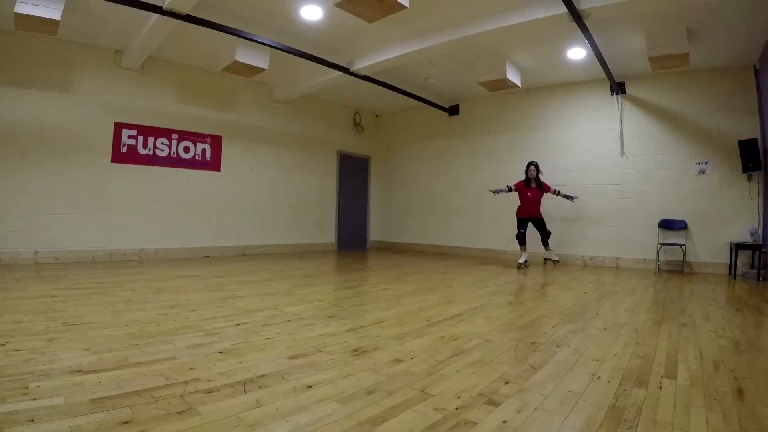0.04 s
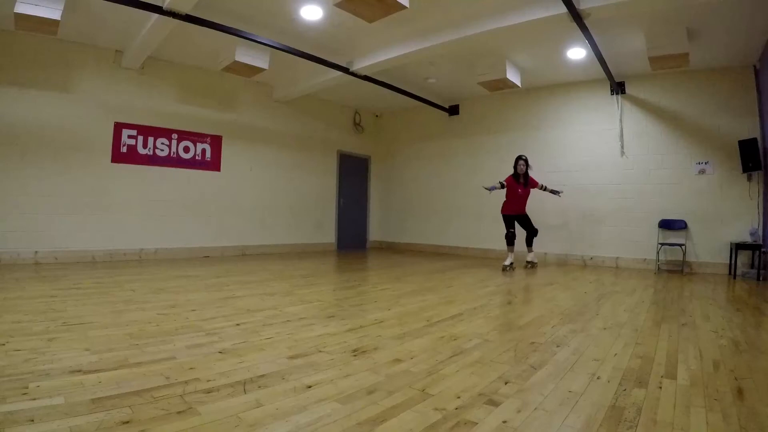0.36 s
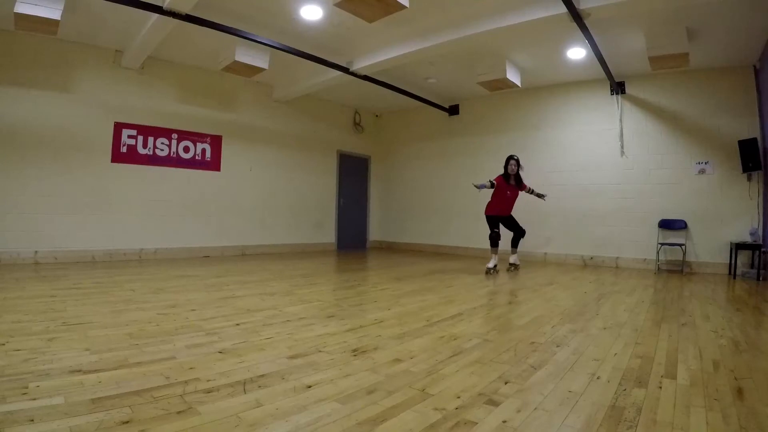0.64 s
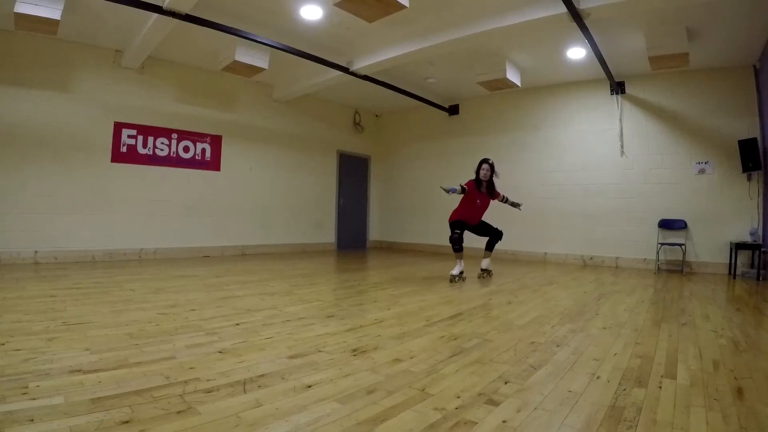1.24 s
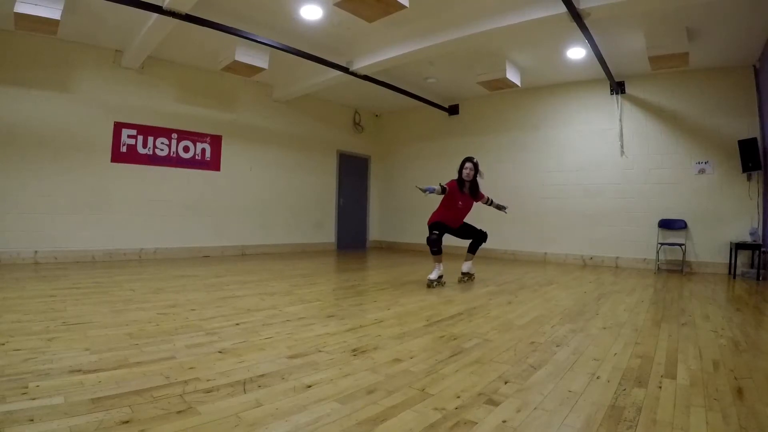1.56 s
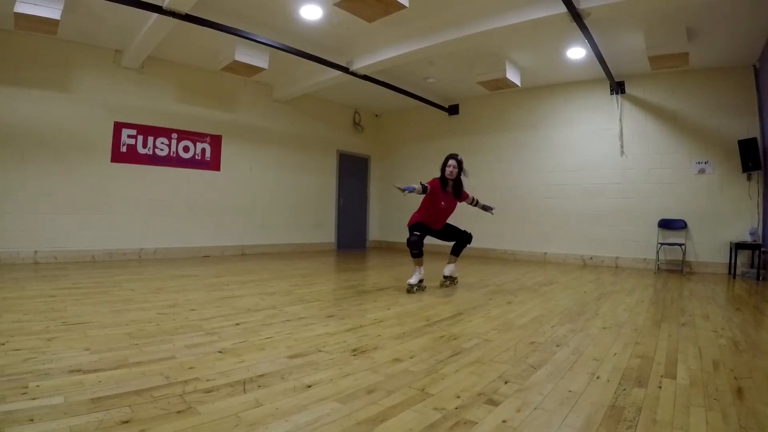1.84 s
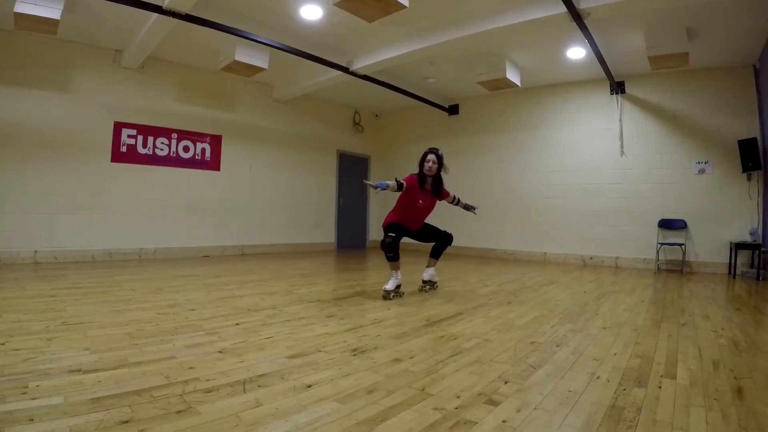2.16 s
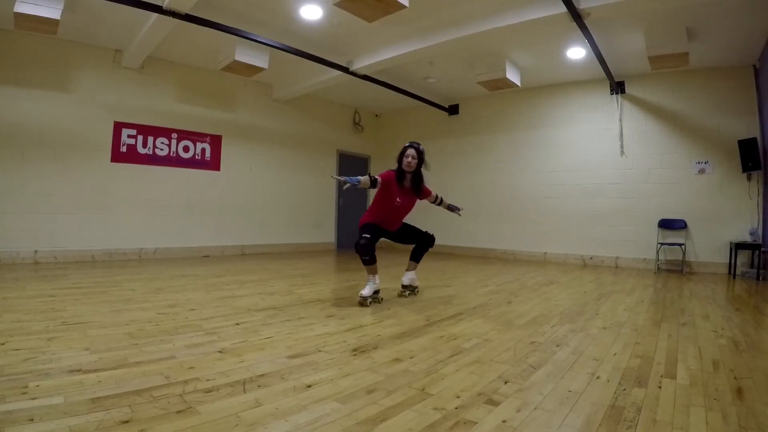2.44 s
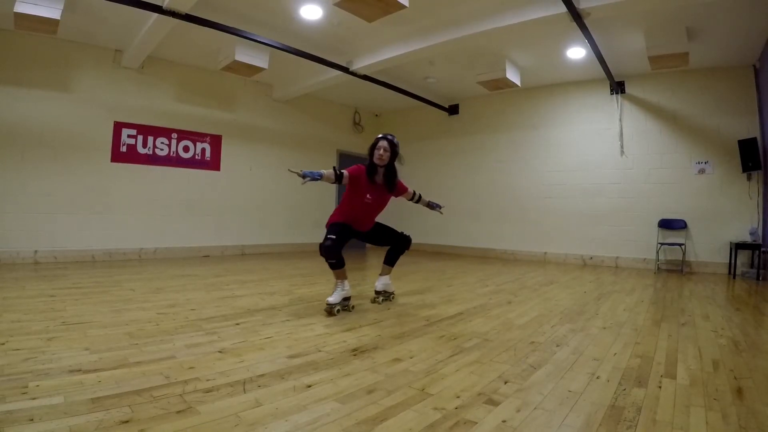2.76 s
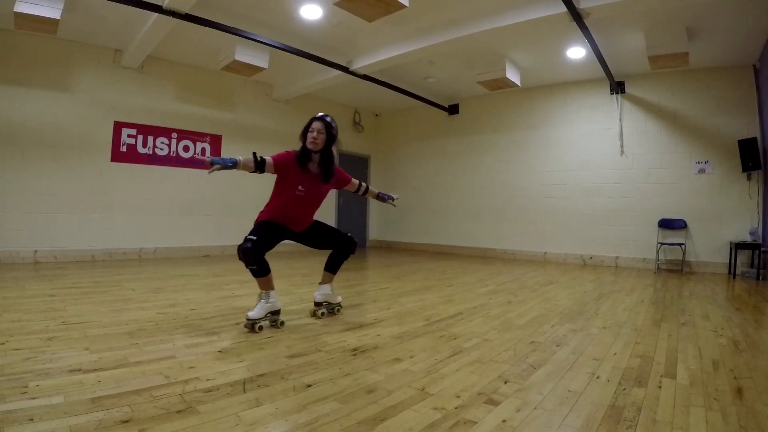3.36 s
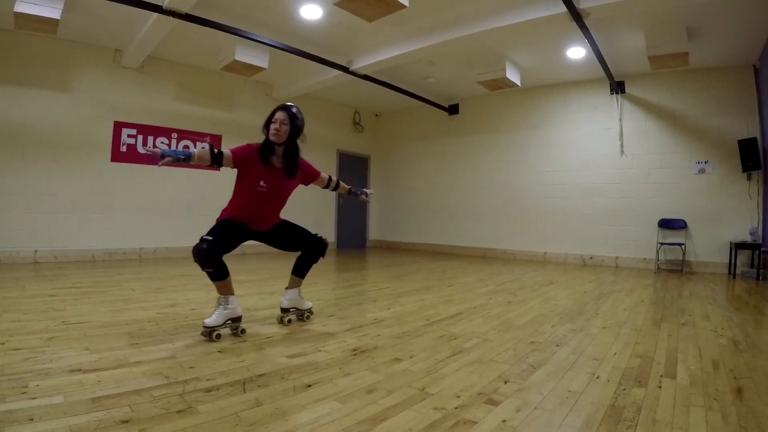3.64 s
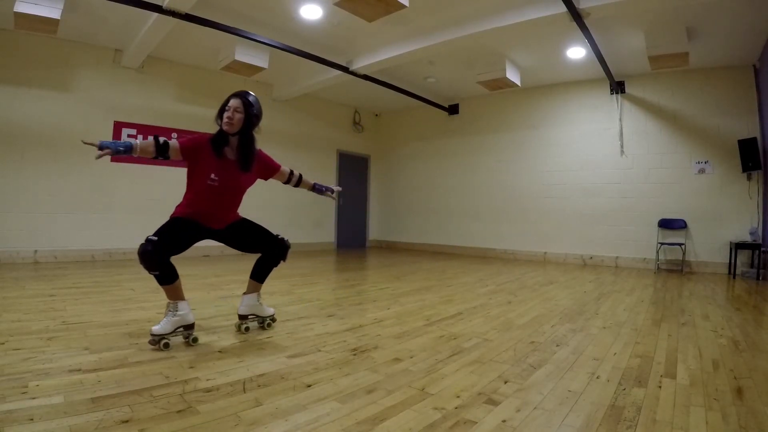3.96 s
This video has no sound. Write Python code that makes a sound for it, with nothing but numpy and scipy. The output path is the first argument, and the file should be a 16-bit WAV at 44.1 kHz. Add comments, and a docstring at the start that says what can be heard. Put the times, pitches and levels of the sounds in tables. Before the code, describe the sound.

Roller skate wheels roll over springy wooden boards with a low, booming rumble.

```python
"""Roller skates glide closer over a springy wooden floor in a large hall. From the start, tiny bumps
under the wheels make the floor boom and rumble and the wheels roar. In the first second or so the wheels
slip sideways twice and knock over board joints; then a loose wheel ticks. After two seconds come more
knocks, a faintly whistling bearing, a rubbing wheel's thin tones and one more tick, as the roar eases.
Ventilation hisses behind it all, with a barely audible electrical whine."""
import sys
import numpy as np
from scipy import signal
from scipy.fft import rfft, irfft, next_fast_len
from scipy.io import wavfile
from scipy.ndimage import map_coordinates

SR = 44100
rng = np.random.default_rng(int(sys.argv[2]) if len(sys.argv) > 2 else 0)


def master_out(mix):
    """Clip the mix to full scale and print it as 16-bit PCM to the path in sys.argv[1]."""
    frames = np.transpose(np.atleast_2d(mix))
    ceiling = np.clip(frames, -1, 1)
    pcm = np.round(ceiling * 32767).astype(np.int16)
    wavfile.write(sys.argv[1], SR, pcm)


N = 176400  # 4 seconds

# The floor's lowest note shifts with the skater's place. Each row: time in seconds, pitch in Hz.
BOOM_PITCHES = [(0.1, 51.9), (0.33, 52.23), (0.69, 45.3), (0.9, 46.62), (1.09, 45.23), (1.2, 46.16),
                (2.13, 46.5), (2.34, 49.16), (2.7, 49.6)]
# How each sound swells and sinks. Each row: time in seconds, level in dB.
BOOM_LEVELS = [(.07, -25.5), (.11, -23), (.23, -35), (.33, -36), (.5, -26.5), (.7, -33), (.94, -26),
               (1.04, -35.5), (1.145, -45), (1.18, -27), (1.3, -27), (1.41, -34), (1.5, -26), (1.56, -31.5),
               (1.605, -39), (1.64, -29), (1.68, -22.5), (1.82, -29), (1.94, -20.5), (2.04, -23),
               (2.12, -33), (2.18, -23), (2.3, -21.5), (2.34, -25.5), (2.38, -34), (2.42, -27),
               (2.445, -25), (2.47, -36), (2.51, -26.5), (2.62, -31.5), (2.75, -46.5), (3.05, -43.5),
               (3.3, -61), (3.39, -38), (3.52, -47), (3.66, -34), (3.82, -47), (3.91, -35), (4, -42)]
BEAM_LEVELS = [(.08, -38), (.3, -38), (.55, -45), (.8, -44), (.95, -34), (1.15, -39), (1.35, -40.5),
               (1.5, -53), (1.7, -42.5), (2.05, -40.5), (2.28, -36), (2.45, -45), (2.55, -42), (2.7, -37),
               (2.87, -38.5), (3, -51), (3.3, -53), (3.5, -45), (3.75, -39.5), (3.98, -43)]  # the beams under the boards
BOARD_LEVELS = [(.08, -46.5), (.45, -44.5), (.53, -33.5), (.64, -37.5), (.73, -33.5), (.88, -38.5),
                (1.07, -37.5), (1.25, -40.5), (1.34, -35), (1.47, -36), (1.57, -43.5), (1.75, -39.5),
                (1.98, -43.5), (2.1, -37), (2.3, -42.5), (2.5, -37.5), (2.6, -43), (3.05, -42.5),
                (3.17, -36.5), (3.3, -40.5), (3.5, -44), (3.72, -42), (3.98, -47.5)]
DRONE_LEVELS = [(.08, -40.5), (.26, -39), (.34, -35), (.42, -32.5), (.52, -39.5), (.63, -37), (.8, -39),
                (1.2, -40), (1.45, -39.5), (1.6, -43), (1.8, -40), (1.98, -46), (2.12, -42.5), (2.5, -42.5),
                (2.7, -38), (2.78, -43), (3.22, -40.5), (3.45, -45), (3.72, -42.5), (3.98, -43.5)]
ROAR_LEVELS = [(.08, -4), (.3, 2), (.65, 2), (1.2, 0), (1.6, -0.5), (1.95, -2), (2.5, -1), (2.85, -4),
               (3.5, -3.5), (4, -5)]  # eases as the skater slows
RING_LEVELS = [(.1, -53.5), (1.1, -46), (1.6, -46), (1.95, -55), (2.3, -53.5), (2.87, -47.5), (3.1, -49.5),
               (4, -48.5)]  # ends higher, as the skates come near
# The notes each part rings at. Each row: pitch in Hz, width in Hz, level in dB.
BEAM_NOTES = [(73, 23, 1), (97.8, 10.8, 0), (119.3, 10.6, -2)]
BOARD_NOTES = [(137.4, 17.8, -4), (165.8, 17.9, 1), (199.5, 11, -10)]
WHEEL_NOTES = [(415, 36.6, 0.5), (572, 27.3, 1), (750, 26, -2.5), (835, 15.4, -3.5), (987, 22, -4.5)]
TICK_NOTES = [(1900, 250, -12), (2550, 320, 3), (3050, 400, -4)]
# The tone colour of each noise. Each row: frequency in Hz, relative level in dB.
DRONE_COLOUR = [(120, -60), (190, -7), (225, 0), (260, -3), (300, -3.5), (335, -6), (370, -5.5),
                (420, -7.5), (520, -14.5), (800, -52)]
ROAR_COLOUR = [(200, -27), (380, -10), (470, 2), (560, -3.5), (660, -6), (745, -4.5), (860, -7.5),
               (980, -5.5), (1300, -11.5), (1700, -14.5), (2050, -19.5), (2600, -23.5), (3300, -25),
               (5000, -30.5), (9000, -38.5), (14000, -66)]
SCUFF_COLOUR = [(600, -9), (1400, -5.5), (1900, 8), (2500, -4), (3200, 4), (4200, -6), (5200, -4),
                (7000, -9.5), (10500, -10), (12000, -22), (14000, -32)]
SIZZLE_COLOUR = [(3000, -14), (4600, -1), (5500, 1), (6400, -4), (8000, -5), (10000, -10), (12000, -24),
                 (14000, -36)]
AIR_COLOUR = [(20, 24), (32, 21.5), (70, 17.5), (110, 15.5), (170, 15.5), (400, 3.5), (900, -6), (1300, -5),
              (1800, -5), (2050, -9.5), (2400, 2), (2700, -1), (3000, -8.5), (3400, -14), (3900, -9.5),
              (4250, -3.5), (4800, -11.5), (5600, -15), (6400, -15.5), (8000, -19.5), (8600, -18),
              (9800, -17.5), (11000, -23), (12500, -27.5), (14000, -36)]
# Sideways slips. Each row: peak time in seconds, level in dB, rise in seconds,
# seconds to fade by 60 dB, treble tilt in dB per octave.
SLIPS = [(.32, -51.5, 0.013, 1.0, 0.5), (1.087, -50.5, 0.0085, 1.35, -2.5)]
# Drops over board joints. Each row: start in seconds, level in dB.
JOINT_HITS = [(.529, -25.5), (.632, -25), (0.725, -39), (2.094, -36), (2.672, -27), (3.148, -38)]
# A knocked board's notes. Each row: pitch in Hz, level in dB, seconds to fade by 60 dB.
KNOCK_NOTES = [(130, -2, 0.12), (174, -3, 0.056), (236.4, -5, 0.14), (420, -16, 0.033)]
# A loose wheel's ticks. Each row: peak time in seconds, level in dB.
AXLE_TICKS = [(1.225, -53), (3.345, -54)]
# A bearing's whistles. Each row: start in seconds, length in seconds, level in dB.
BEARING_WHISTLES = [(2.219, 0.4, -65), (2.808, 0.048, -65), (3.05, 0.092, -65)]
# A wheel's rubs. Each row: start in seconds, length in seconds, pitch in Hz, level in dB.
WHEEL_RUBS = [(2.715, .43, 1860, -64), (3.55, 0.45, 1664, -67)]
# The tones in the whistle and in the whine. Each row: pitch in Hz, level in dB.
WHISTLE_TONES = [(2326, -5), (2557, 1.5), (5592, 0), (5348, -8.5), (8613, -10)]
WHINE_TONES = [(5000, -81), (8613, -88)]
# How the two microphones differ. Each row: frequency in Hz, likeness from 0 to 1,
# how far the left is ahead in radians, left minus right level in dB.
MICS = [(50, .999, .15, -.7), (170, .98, .1, 2.1), (280, .88, 0, 3.8), (340, .6, -.4, 5.6),
        (480, .3, -1.8, 4.2), (600, .7, -1.8, .7), (800, .64, -1.9, -1.5), (1050, .8, -3.2, -2.3),
        (1700, .84, -3.8, -1.6), (2130, .55, -4.6, 2), (2350, .78, -5.6, -.3), (2600, .8, -5, -1.1),
        (2870, .72, -5.5, 0), (3250, .63, -5.2, -2.3), (3850, .62, -6.3, -2.2), (4250, .8, -6.25, -1),
        (4550, .55, -6.8, -1.5), (4900, .35, -7.6, -1.7), (5500, .4, -8.9, -2), (6500, .1, -8.9, -3),
        (9500, .05, -8.9, -4.7), (13000, .03, -8.9, -1.5)]

BUMPS_PER_S, BOARDS_TOP_HZ = 2200, 558
BOARD_GAIN_DB, DRONE_GAIN_DB, ROAR_GAIN_DB = -1, -0.5, -46
SIDES = np.array([[.5], [-.5]])  # splits a difference between left and right


def floor_boom():
    """The wheels set the whole springy floor swinging at its lowest note."""
    hz = curve(BOOM_PITCHES) + 0.47 * wobble(7.45)
    phase = 2 * np.pi * np.cumsum(hz) / SR
    _, lead, lean_db = look_up(MICS, hz.mean())
    level_db = curve(BOOM_LEVELS) - 0.5 * wobble(15) + SIDES * lean_db
    return np.sqrt(2) * amp(level_db) * np.sin(phase + SIDES * lead)


def floor_rumble():
    """Bumps shake the deep beams and the boards, with a drone on top; the wood muffles higher sounds."""
    beams = at_mics(ringing(bumps(), BEAM_NOTES)) * amp(curve(BEAM_LEVELS))
    boards = at_mics(ringing(bumps(), BOARD_NOTES)) * amp(BOARD_GAIN_DB + curve(BOARD_LEVELS))
    drone = at_mics(coloured(bumps(), DRONE_COLOUR)) * amp(DRONE_GAIN_DB + curve(DRONE_LEVELS))
    return filtered(beams + boards + drone, lambda hz: 1 / (1 + (hz / BOARDS_TOP_HZ) ** 4))


def rolling_wheels(flutter_db=0.85):
    """The rolling treads roar finely and make the wheels and their mounts ring hollowly."""
    roar = at_mics(coloured(bumps(), ROAR_COLOUR))
    roar *= amp(ROAR_GAIN_DB + curve(ROAR_LEVELS) + flutter_db * wobble(21.53))
    ring = at_mics(drifting(ringing(bumps(), WHEEL_NOTES)))
    return roar + ring * amp(curve(RING_LEVELS))


def bumps():
    """The uneven floor gives the wheels many tiny random pushes, which echo in the hall."""
    hits = rng.random((2, N)) < BUMPS_PER_S / SR
    direction = np.sign(noise())
    strength = np.exp(0.27 * noise())
    return hall(hits * direction * strength)


def joint_knocks(rise_s=0.0016):
    """A wheel drops over a joint, and the board rings briefly with a soft thud."""
    out = np.zeros(N)
    for start, db in JOINT_HITS:
        t = np.maximum(clock() - start, 0)
        onset = 1 - np.exp(-t / rise_s)
        for hz, note_db, fade_s in KNOCK_NOTES:
            level = amp(db + note_db + rng.normal(0, 1.7) - 60 * t / fade_s)
            out += onset * level * np.sin(2 * np.pi * hz * t)
    return hall(np.array([out, out]))


def scuffs(pivot_hz=3000):
    """Wheels slip sideways with a rasp that dies away; the first slip is the brighter one."""
    out = np.zeros((2, N))
    rasp = at_mics(coloured(noise(), SCUFF_COLOUR))
    for peak_s, db, rise_s, fade_s, tilt_db in SLIPS:
        tilted = unit(filtered(rasp, lambda hz: amp(tilt_db * np.log2(.1 + hz / pivot_hz))))
        out += tilted * amp(db) * burst(peak_s, rise_s, fade_s)
    return out


def axle_ticks():
    """A loose wheel rattles briefly against its axle."""
    level = sum(amp(db) * burst(peak_s, rise_s=0.0046, fade_s=0.11) for peak_s, db in AXLE_TICKS)
    return level * at_mics(ringing(noise(), TICK_NOTES))


def bearing_whistle(sizzle_db=-3):
    """A wheel bearing whistles faintly on a few wavering tones, with a little sizzle."""
    level = sum(amp(db) * held(start, length) for start, length, db in BEARING_WHISTLES)
    whistle = sum(wavering(hz, db) for hz, db in WHISTLE_TONES)
    sizzle = at_mics(coloured(noise(), SIZZLE_COLOUR))
    return level * (whistle + amp(sizzle_db) * sizzle)


def rubbing_wheel():
    """A rubbing wheel sings one thin tone at a time."""
    return sum(held(start, length) * wavering(hz, db) for start, length, hz, db in WHEEL_RUBS)


def ventilation(level_db=-43):
    """Moving air hisses steadily; the camera's housing adds two humps in the treble."""
    return amp(level_db) * at_mics(coloured(noise(), AIR_COLOUR))


def electrical_whine():
    """The camera's electronics give off two very faint, steady tones."""
    return sum(amp(db) * stereo_tone(2 * np.pi * hz * clock(), hz) for hz, db in WHINE_TONES)


def hall(pair, fade_s=0.99, echo_db=-5.5):
    """The hall adds a smooth echo that drops by 60 dB in fade_s."""
    t = np.arange(SR) / SR
    tail = rng.standard_normal((2, SR)) * amp(-60 * t / fade_s)
    echo = signal.fftconvolve(pair, tail / np.linalg.norm(tail[0]), axes=1)[:, :N]
    return pair + amp(echo_db) * echo


def at_mics(pair):
    """Blend two unrelated sounds into a partly alike left and right, at an average strength of 1."""
    def paths(hz):
        alike, lead, lean_db = look_up(MICS, hz)
        turn = np.arccos(np.clip(alike, 0, 1)) / 2
        shared, apart = np.cos(turn), np.sin(turn)
        left = amp(lean_db / 2) * np.exp(.5j * lead) / np.sqrt((amp(lean_db) + amp(-lean_db)) / 2)
        right = left * amp(-lean_db) * np.exp(-1j * lead)
        return np.array([[left * shared, left * apart], [right * shared, -right * apart]])
    return unit(filtered(pair, paths).sum(axis=1))


def drifting(pair, share=.018):
    """The pitch wanders by a small share as the skater's weight shifts."""
    place = np.cumsum(1 + share * wobble(4))
    return np.array([map_coordinates(side, [place], mode="mirror") for side in pair])


def wavering(hz, db, waver_hz=6.3, waver_db=2.5):
    """A tone whose pitch and level tremble slightly."""
    phase = 2 * np.pi * np.cumsum(hz + waver_hz * wobble(40)) / SR
    return amp(db + waver_db * wobble(22)) * stereo_tone(phase, hz)


def stereo_tone(phase, hz):
    """A pure tone that reaches the two microphones out of step."""
    lead = look_up(MICS, hz)[1]
    return np.sqrt(2) * np.sin(phase + SIDES * lead)


def ringing(x, notes):
    """Let a sound ring at the given notes, every second one flipped in sign."""
    def response(hz):
        return sum((-1) ** k * amp(db) * 1j * hz * width / (pitch ** 2 - hz ** 2 + 1j * hz * width)
                   for k, (pitch, width, db) in enumerate(notes))
    return filtered(x, response)


def coloured(x, colour):
    """Give a sound a tone colour."""
    return filtered(x, lambda hz: amp(look_up(colour, hz)[0]))


def filtered(x, response):
    """Multiply each frequency in a sound by response(hz)."""
    size = next_fast_len(N + SR // 2)
    return irfft(rfft(x, size) * response(np.fft.rfftfreq(size, 1 / SR)), size)[..., :N]


def burst(peak_s, rise_s, fade_s):
    """Rise to 1, then drop by 60 dB in fade_s."""
    t = clock() - peak_s
    return np.clip(1 + t / rise_s, 0, 1) * amp(-60 * np.maximum(t, 0) / fade_s)


def held(start, length, edge_s=.015):
    """Switch softly on, hold, and switch softly off."""
    return np.clip(np.minimum(clock() - start, start + length - clock()) / edge_s, 0, 1)


def wobble(rate):
    """A smooth curve through `rate` random points a second."""
    points = rng.standard_normal(int(N * rate / SR) + 4)
    return map_coordinates(points, [np.arange(N) * rate / SR])


def noise():
    """Two unrelated channels of plain hiss."""
    return rng.standard_normal((2, N))


def curve(rows):
    """Join (time, value) points with straight lines."""
    return np.interp(clock(), *np.transpose(rows))


def look_up(rows, hz):
    """Read a table's other columns at a frequency, on a log scale."""
    freqs, *columns = np.transpose(rows)
    return [np.interp(np.log(hz + 1), np.log(freqs + 1), column) for column in columns]


def clock():
    """Each sample's time in seconds."""
    return np.arange(N) / SR


def amp(db):
    """Turn decibels into a multiplier."""
    return 10 ** (np.asarray(db) / 20)


def unit(x):
    """Scale to an average strength (rms) of 1."""
    return x / np.sqrt(np.mean(x ** 2) + 1e-20)


def scene():
    """Add up the floor, the skates and the background."""
    rolling = floor_boom() + floor_rumble() + rolling_wheels()
    details = scuffs() + joint_knocks() + axle_ticks() + bearing_whistle() + rubbing_wheel()
    return rolling + details + ventilation() + electrical_whine()


def record(dry, start_s=0.073, fade_in_s=0.014, top_hz=14250):
    """Fade in after a moment of silence and cut the highest treble."""
    fade_in = np.clip((clock() - start_s) / fade_in_s, 0, 1)
    return filtered(dry * fade_in, lambda hz: hz < top_hz)


dry = scene()
out = record(dry)
master_out(out)
```